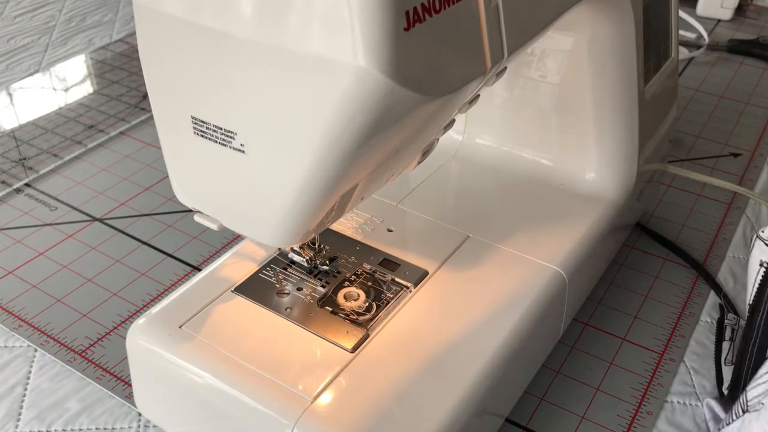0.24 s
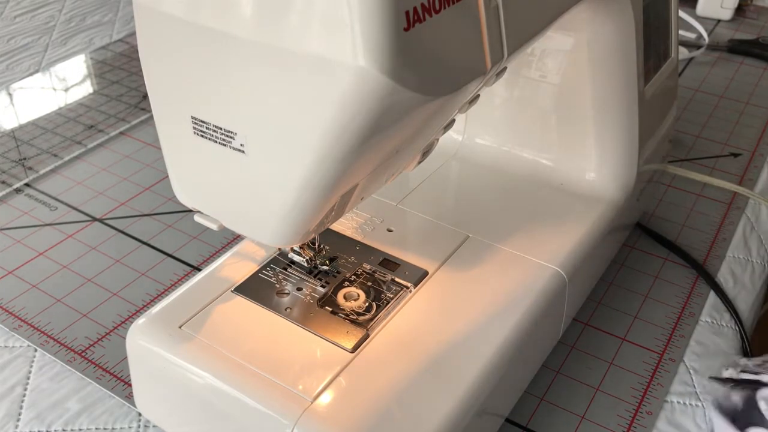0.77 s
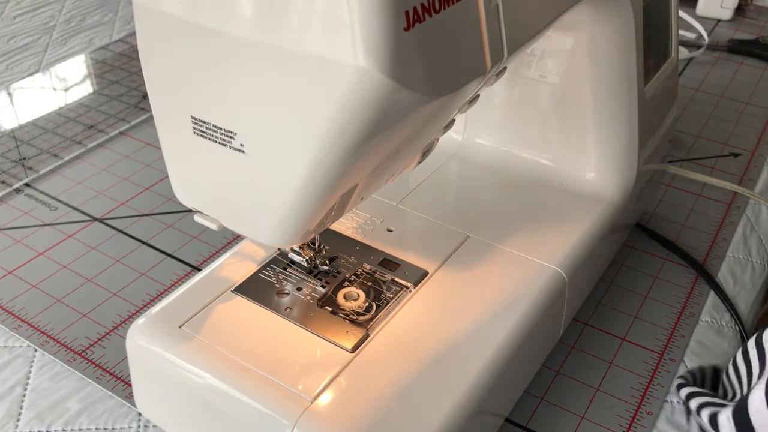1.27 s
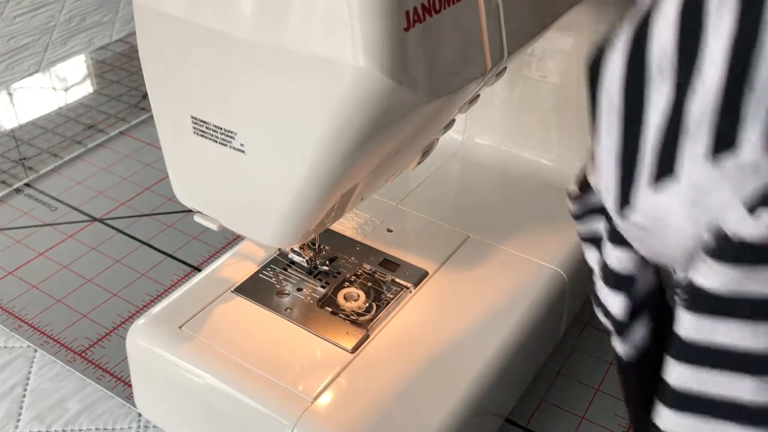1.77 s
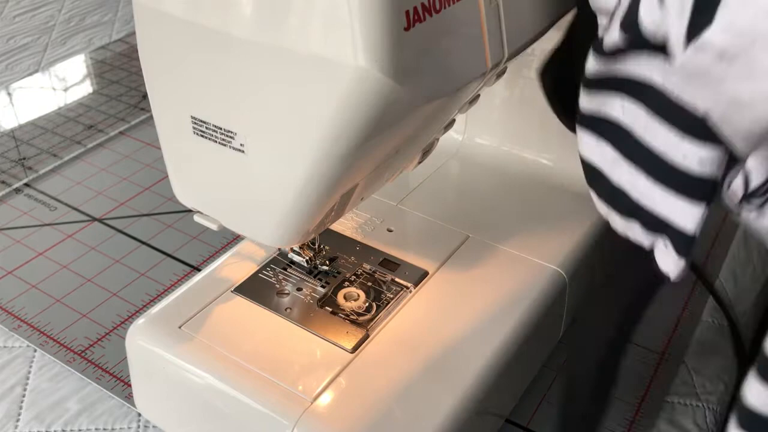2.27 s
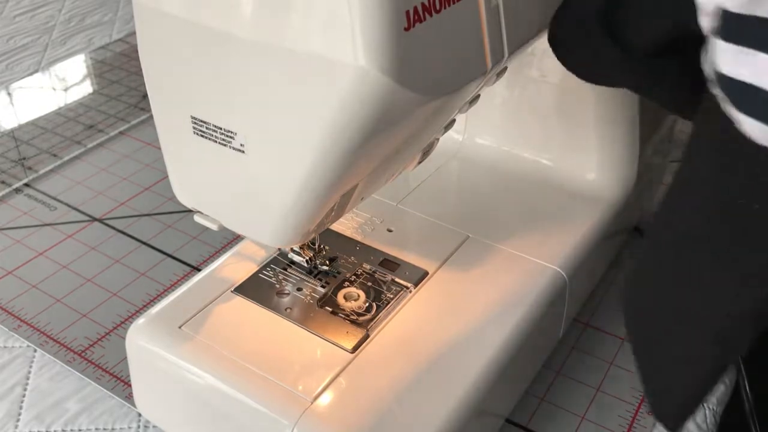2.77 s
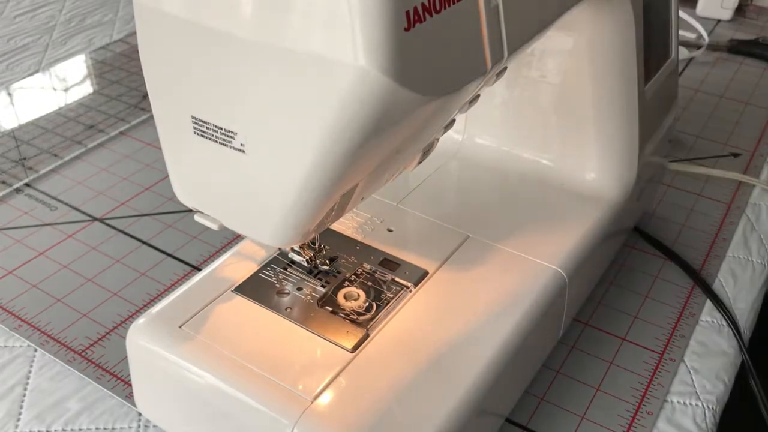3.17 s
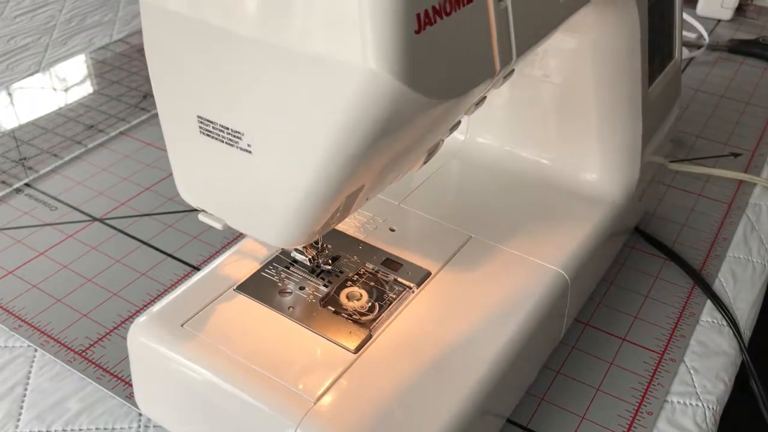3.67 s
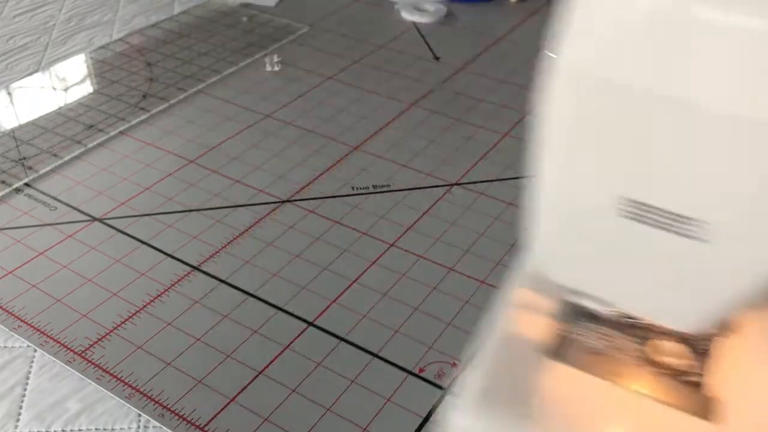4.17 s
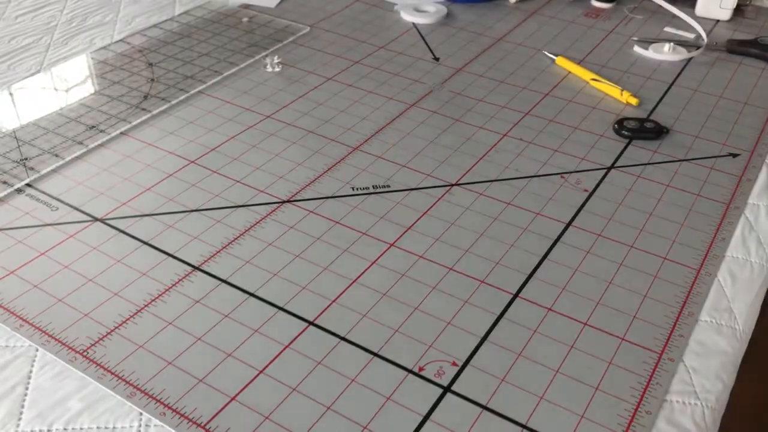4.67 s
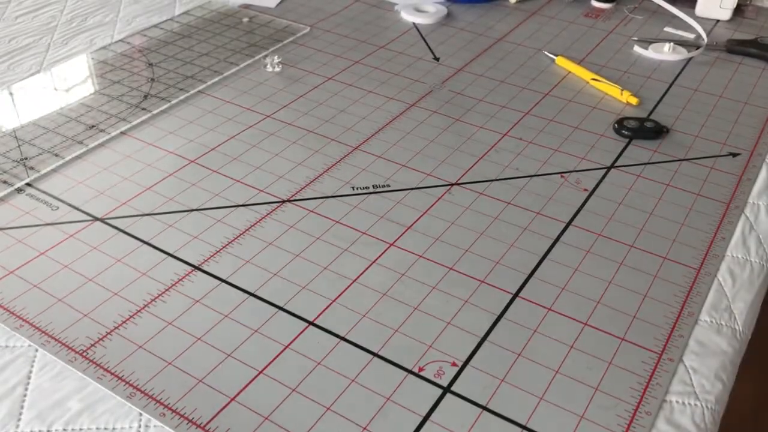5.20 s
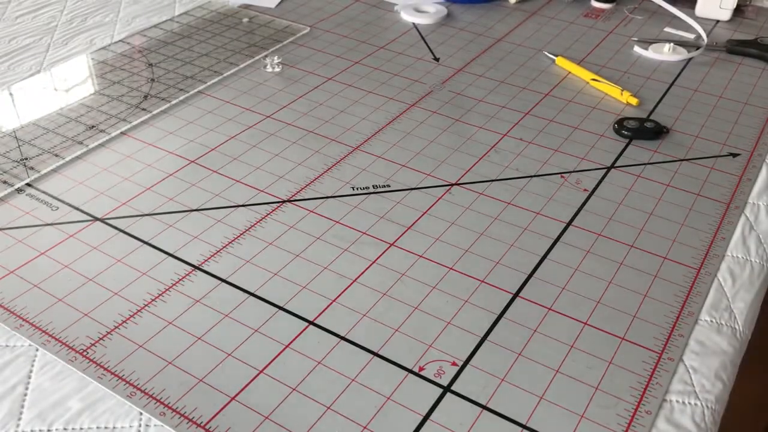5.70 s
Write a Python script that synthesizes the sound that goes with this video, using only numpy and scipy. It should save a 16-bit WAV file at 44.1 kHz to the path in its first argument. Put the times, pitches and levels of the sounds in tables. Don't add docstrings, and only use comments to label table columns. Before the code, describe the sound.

In a quiet room a zipper buzzes twice, fabric is shaken out, and a hollow plastic machine clunks, scrapes aside, followed by small ticks and rustles.

```python
import sys
import numpy as np
from scipy import signal
from scipy.fft import rfft, irfft
from scipy.io import wavfile
from scipy.ndimage import uniform_filter1d

SR = 44100
rng = np.random.default_rng(int(sys.argv[2]) if len(sys.argv) > 2 else 0)


def master(y):
    cut = np.clip(np.atleast_2d(y).T, -1, 1)
    pcm = np.round(cut * 32767)
    wavfile.write(sys.argv[1], SR, pcm.astype(np.int16))


def volts_from_db(level):
    exponent = np.asarray(level, float) / 20
    return 10 ** exponent


N = 262130
SECONDS = np.arange(N) / SR

# (frequency [Hz], width [Hz], level [dB])
TAPE = [(258, 274, 1.5), (450, 260, 6.5), (650, 180, 4.5), (983, 250, 1.5), (1050, 156, 4), (1720, 220, -3)]


def rms_one(x):
    return x / np.sqrt(np.mean(x ** 2) + 1e-20)


def even(x, size):
    return x / np.sqrt(uniform_filter1d(x ** 2, size=size) + 1e-12)


def in_time(rows):
    s, *columns = np.transpose(rows)
    return [np.interp(SECONDS, s, column) for column in columns]


def within(rows, fade=0.0044):
    start, end = rows[0][0], rows[-1][0]
    return np.interp(SECONDS, [start - fade, start, end, end + fade], [0, 1, 1, 0])


def band(x, low_hz, high_hz, order=2):
    edges = [low_hz, min(high_hz, 0.45 * SR)]
    sos = signal.butter(order, edges, "band", fs=SR, output="sos")
    return signal.sosfilt(sos, x + 1e-18)


def colour(x, points):
    hz = np.maximum(np.arange(N // 2 + 1) * SR / N, 1)
    point_hz, point_db = np.transpose(points)
    gain_db = np.interp(np.log(hz), np.log(point_hz), point_db, -90, -90)
    return irfft(rfft(x) * volts_from_db(gain_db), N)


def drift(rate):
    r = np.exp(-80 * np.pi * rate / SR)
    noise = rng.standard_normal(N // 40 + 2002)
    slow = signal.lfilter([1], [1, -2 * r, r * r], noise)[2000:]
    return np.interp(np.arange(N) / 40, np.arange(len(slow)), rms_one(slow))


def resonate(x, peaks):
    out = 0
    for k, (hz, width, db) in enumerate(peaks):
        r = np.exp(-np.pi * max(width, 1) / SR)
        poles = [1, -2 * r * np.cos(2 * np.pi * hz / SR), r * r]
        zeros = [(1 - r * r) / 2, 0, (r * r - 1) / 2]
        out = out + (-1) ** k * volts_from_db(db) * signal.lfilter(zeros, poles, x + 1e-18)
    return out


def grains(per_s, spread_db):
    sizes = volts_from_db(spread_db * np.minimum(rng.exponential(1, N), 5)) * rng.choice([-1, 1], N)
    return sizes * (rng.random(N) < per_s / SR)


def swells(s, length, db):
    drop_db, rise_share = 13, 0.49
    t = np.arange(0, N + 64, 64) / SR
    late = (t[:, None] - s) / np.maximum(length, 0.01)
    gain = volts_from_db(db - drop_db * np.maximum(late, -late / rise_share)).sum(axis=1)
    return np.interp(SECONDS, t, gain)


def background():
    # (frequency [Hz], level per Hz [dB])
    air_spectrum = [(25, -39), (45, 7.5), (76, 8.5), (160, -5.5), (300, -6), (600, -11), (1200, -13),
                    (3000, -26.5), (7000, -22), (15800, -16.5)]
    # (peak time [s], length [s], level [dB])
    rumble_swells = [(1.955, 0.21, -45), (2.31, 0.41, -60), (3.176, 0.32, -53.5), (3.603, 0.13, -70),
                     (3.947, 0.98, -60.5), (4.6, 1, -62.5), (5.19, 0.22, -69)]
    # (frequency [Hz], width [Hz], level [dB])
    hum_tones = [(42, 2.7, -102), (60.5, 1.7, -77), (78.24, 1.15, -66.5), (117, 0.94, -73),
                 (217.7, 5.3, -63)]
    air = volts_from_db(-60.5) * rms_one(colour(rng.standard_normal(N), air_spectrum))
    rumble_gain = (volts_from_db(-82) + swells(*np.transpose(rumble_swells))) * volts_from_db(2 * drift(2.5))
    rumble = rumble_gain * rms_one(band(rng.standard_normal(N), 33, 126))
    hum = 0
    for hz, width, db in hum_tones:
        tone = resonate(rng.standard_normal(N), [(hz, width, 0)])
        hum = hum + volts_from_db(db) * even(tone, 3000)
    return air + rumble + hum


def lone_teeth():
    # (time [s], rasp peak [dB], tape body [dB])
    teeth = [(0.0191, -34, -38.5), (0.3577, -44, -34), (0.3971, -39, -35), (0.418, -41, -37),
             (0.598, -38.5, -39), (0.62, -45, -61), (0.63, -40.5, -38), (0.646, -44, -38),
             (0.653, -49, -38), (0.673, -42, -37), (0.678, -42.5, -41), (0.691, -39, -55),
             (0.694, -48, -29.5), (0.709, -42, -32), (0.717, -35.5, -33), (0.73, -36.5, -33),
             (1.017, -46, -55), (1.0222, -26, -29.5)]
    rasp, tugs = np.zeros(N), np.zeros(N)
    scrape_shape = np.exp(-(np.arange(300) / 127.0) ** 2)
    for s, rasp_db, body_db in teeth:
        i = round(s * SR)
        rasp[i:i + 300] += volts_from_db(rasp_db) * rng.standard_normal(300) * scrape_shape
        tugs[i + 30] = volts_from_db(body_db + 23.0)
    body = resonate(band(tugs, 110, 1400), TAPE) + 0.33 * band(tugs, 130, 410)
    return band(rasp, 680, 21000) + body


def rubbing():
    # (time of greatest pressure [s], length [s], level [dB], brightness [dB])
    strokes = [(0.26, 0.23, -63, 26.5), (0.572, 0.33, -61, 23), (0.743, 0.11, -40, -2),
               (1.015, 0.035, -50, -12), (1.275, 0.34, -51, 11.5), (1.678, 0.13, -56.5, 23.5),
               (1.912, 0.065, -33.5, 8), (2, 0.44, -49, 2), (2.368, 0.46, -62, 13), (2.55, 0.18, -63.5, 8),
               (2.743, 0.053, -65, -25.5), (2.743, 0.13, -67.5, 45.5), (2.882, 0.056, -58, -12.5),
               (2.893, 0.2, -48, 5), (3.107, 0.11, -37.5, 4), (3.2, 0.13, -61, -6.5),
               (3.423, 0.16, -51.5, -1), (3.638, 0.17, -53.5, 20.5), (3.79, 0.39, -56.5, -11.5),
               (4.05, 0.18, -42, 16), (4.175, 0.13, -58, -8.5), (4.446, 0.13, -61.5, 15),
               (4.588, 0.055, -39, 5), (4.65, 0.061, -48, 6.5), (4.777, 0.17, -47, 4.5),
               (5.072, 0.36, -50, -0.5), (5.205, 0.056, -68, -5), (5.285, 0.1, -46, -6.5),
               (5.8, 0.049, -49, -3), (5.905, 0.077, -49, 5.5)]
    edges_hz = [230, 700, 2500, 7000, 15800]
    # (offsets [dB]), (share of brightness [0-1])
    balance = [(-2, 0.8, 0.14, 0.1), (-1.33, 0.054, 0.43, 0.6)]
    fibres = grains(1200 * volts_from_db(2.0 * drift(23)), 1.3) + rng.standard_normal(N)
    flicker_db = 1.2 * drift(14)
    s, length, db, bright = np.transpose(strokes)
    out = 0
    for low_hz, high_hz, offset, share in zip(edges_hz, edges_hz[1:], *balance):
        layer = rms_one(band(fibres, low_hz / 1.2, high_hz * 1.2))
        out = out + swells(s, length, db + offset + share * bright) * layer
    return volts_from_db(flicker_db - 10.0) * out


def ticks(size=200):
    # (time [s], peak level [dB], frequency [Hz])
    tick_rows = [(0.3993, -34, 1170), (0.4191, -31, 1080), (.598, -34, 4530), (2.7126, -24, 6000),
                 (2.9064, -39, 2500), (3.0552, -20, 4900), (3.072, -19, 3600), (3.08, -18, 5060),
                 (3.091, -27.5, 1510), (3.7158, -15.5, 6700), (3.758, -32, 1000), (3.7853, -44, 2270),
                 (3.786, -37, 3820), (3.85, -54, 700), (3.899, -34, 800), (4.1614, -32, 2150),
                 (4.1626, -30, 1000), (4.1814, -51, 2150), (4.5661, -27, 4830), (4.745, -32, 2980),
                 (4.843, -47, 7000), (5.014, -42, 4050), (5.0135, -34, 6100), (5.1253, -35, 3860),
                 (5.1934, -37, 1800), (5.2558, -32, 3400), (5.28, -33, 5030), (5.4906, -37, 3530),
                 (5.589, -44, 2400), (5.8318, -42, 2960), (5.852, -35, 2800), (5.743, -50, 1600),
                 (5.909, -40, 1600), (5.912, -42, 2900), (4.2, -42, 2400)]
    cycles = 2.8
    t, out = np.arange(size) / SR, np.zeros(N + size)
    for s, db, hz in tick_rows:
        fade = volts_from_db(db + 0.5 - 20 * t * hz / cycles)
        out[round(s * SR):][:size] += fade * np.sin(2 * np.pi * hz * t)
    return out[:N]


def pull(rows, tape, seated, between, push_hz, taut_db):
    # (frequency [Hz], level per Hz [dB])
    rasp_spectrum = [(700, -5), (1200, -6.5), (2000, -7.5), (3000, -12), (5500, -9.5), (8500, -9.5),
                     (12000, -5), (16500, -1)]
    per_s, body_db, uneven = in_time(rows)
    rasp_db = body_db + 4.5 + 3.5 * np.log2(per_s / 224)
    on = within(rows)
    pace = per_s * on * np.clip(1 + uneven * drift(120), 0.2, 2)
    teeth = np.cumsum(pace) / SR
    tooth, chance = np.ceil(teeth).astype(int), rng.standard_normal(N)
    strength = volts_from_db(1.7 * chance[tooth])
    tugs = np.diff(np.floor(teeth), prepend=0) * strength ** 0.7

    until = (1 - teeth % 1) / per_s
    scrape = (strength * np.exp(-(until / seated) ** 4) + between * (per_s / 250) ** 2) * on
    grit = scrape * (rng.standard_normal(N) + 0.14 * grains(1600, 2))

    drive = band(tugs, 140, push_hz, order=1) + 0.018 * grit
    flex = rms_one(uniform_filter1d(chance, size=7))
    taut = taut_db * np.log2(np.minimum(per_s / 330, 1))
    body = 0
    for k, peak in enumerate(tape):
        gain_db = flex[tooth + 500 * (k + 1)] + taut * np.log2(peak[0] / 400)
        if k == 0:
            gain_db = gain_db - 44 * uneven
        body = body + (-1) ** k * resonate(drive * volts_from_db(gain_db), [peak])

    sings = volts_from_db(4.5 + 42 * np.log2(per_s / 400)) * resonate(grit, [(6400, 900, 0)])
    rasp = colour(grit + sings, rasp_spectrum)
    mix = volts_from_db(body_db) * even(body, 2200) + volts_from_db(rasp_db) * even(rasp, 2200)
    return mix * within(rows, 0.004)


def cracks(size=900):
    # (time [s], peak level [dB], t60 [s])
    edges = [
        (1.0232, -18, 0.0051),
        (1.8758, -15, 0.015),
        (3.0525, -35, .01),
        (3.0698, -28, .01),
        (3.7153, -19, 0.019),
        (4.565, -24, .014),
        (4.5672, -24, 0.0079),
        (5.2545, -36.5, .01),
    ]
    t, out = np.arange(size) / SR, np.zeros(N + size)
    for s, db, t60 in edges:
        hiss = rng.standard_normal(size) * volts_from_db(-60 * t / max(t60, 0.004))
        burst = band(hiss, 9000, 17500)
        out[round(s * SR):][:size] += volts_from_db(db) * burst / np.abs(burst).max()
    return out[:N]


def end_stop():
    stop_s, push_s = 1.0248, 0.003
    push = np.sin(np.pi * np.clip((SECONDS - stop_s) / push_s, 0, 1))
    return volts_from_db(-33) * band(push, 70, 4000, order=1)


def flap():
    # (time [s], boom level [dB])
    push = [
        (1.84, -55),
        (1.854, -31),
        (1.876, -26.5),
        (1.908, -37.5),
        (1.934, -33.5),
        (1.966, -51),
        (2.014, -42.5),
        (2.036, -55),
        (2.2, -60),
    ]
    # (frequency [Hz], width [Hz], level [dB])
    air_modes = [(101, 17, -2), (148.5, 13.8, 2.5), (250, 82, -21.5)]
    # (peak time [s], length [s], level [dB])
    settling = [(1.893, 0.073, -40)]
    boom_db = in_time(push)[0]
    boom = even(resonate(rng.standard_normal(N), air_modes), 1200)
    rustle = rms_one(band(grains(1700, 3.5) + rng.standard_normal(N), 570, 5600, order=1))
    mix = volts_from_db(boom_db) * boom + swells(*np.transpose(settling)) * rustle
    return mix * within(push, 0.0026)


def blow_rows():
    # (time [s], peak level [dB], brightness [dB], t60 [s])
    knock_rows = [(1.8435, -39, -2.5, 0.16), (2.703, -27.5, -14, 0.22), (2.7045, -47, 6.5, 0.39),
                  (3.371, -39.5, -34, 0.011), (3.439, -53, 2, 0.039), (3.499, -37.5, 0, 0.017),
                  (3.787, -59, 5.5, 0.066), (3.898, -55, -27, 0.04), (4.115, -49, 6, 0.028),
                  (4.161, -47, 5.5, 0.1), (4.178, -38, 0.5, 0.053), (5.052, -54, -5, 0.51),
                  (5.194, -40.5, 3, .03), (5.241, -50, -4, 0.11), (5.293, -52, 6, 0.015),
                  (5.378, -65, 6.5, 0.028), (5.732, -53, -8, 0.038), (5.744, -53, -32.5, 0.34),
                  (5.896, -59, 6, 0.12), (5.908, -46.5, 0.5, 0.11)]
    # (time [s], peak level [dB], brightness [dB], t60 [s])
    thud_rows = [(2.184, -44, 9, 0.089), (2.251, -55.5, 11, 0.11), (2.509, -50.5, -17, 0.056),
                 (2.566, -44.5, -27, 0.076), (2.676, -40.5, -30, 0.37), (2.918, -48, -1, 0.025),
                 (2.944, -35, 7, 0.051), (3.494, -31.5, 8, 0.023), (3.758, -38, -12, 0.0097),
                 (3.849, -50.5, -27, 0.049), (5.009, -57.5, 11, 0.17), (5.025, -56.5, 10, 0.21),
                 (5.278, -41, -15, 0.15), (5.436, -48.5, -64, 0.03), (5.56, -48.5, -31, 0.061),
                 (5.59, -55.5, -7, 0.074), (5.716, -54.5, -36, 0.16), (5.764, -73, -8, 0.084),
                 (5.817, -50.5, 7.5, 0.089), (5.83, -48.5, 8, 0.086), (5.85, -51.5, 9.5, 0.25)]
    # (time [s], peak level [dB], brightness [dB], t60 [s])
    snap_rows = [(1.856, -42.5, 11.5, 0.076), (1.876, -46, 16, 0.044), (1.8803, -27.5, 4, 0.047),
                 (2.657, -63, -15, 0.025), (3.052, -52, 12, 0.13), (3.07, -33.5, 1, 0.33),
                 (3.077, -39.5, 6.5, 0.13), (3.392, -48, -1, 0.046), (3.664, -45, 14.5, 0.04),
                 (3.715, -35.5, 9, 0.034), (4.392, -37, -9, 0.053), (4.555, -46, 5, 0.083),
                 (4.5648, -51, 14.5, 0.39), (4.739, -66, 21, 0.032), (4.745, -42, -0.5, 0.17),
                 (4.804, -54, 9, 0.039), (4.839, -58, 11.5, 0.11), (5.126, -45, 0.5, 0.15),
                 (5.256, -39.5, 2, 0.048), (5.49, -39, -7.5, 0.051), (5.505, -53, 2, 0.039),
                 (5.565, -68, 11, 0.024)]
    # (offsets [dB]), (change per dB of brightness [dB])
    knock_kind = [(0, -25.5, -10.5, -28, -24), (0, 4, 3, 6, 4.5)]
    thud_kind = [(-0.74, 0.011, -6.5, -36.5, -34.5), (0.31, 0.0082, 0.14, 3.5, 3)]
    snap_kind = [(-2.5, -9.5, -2, 0.82, -3), (0.14, 0, 0.1352, 1, 0.51)]
    blows = []
    for rows, kind in [(knock_rows, knock_kind), (thud_rows, thud_kind), (snap_rows, snap_kind)]:
        offsets, shares = np.array(kind)
        for s, db, bright, t60 in rows:
            blows.append((s, *(db + offsets + bright * shares), t60))
    return np.array(sorted(blows))


def knocks(size=5000):
    # (frequency [Hz], level [dB], t60 [s])
    shell = [(293.6, -9, 0.16), (369, 1.5, 0.011), (562.3, -10, 0.086), (615, -9.5, 0.018),
             (863, -8.5, 0.054), (1050, -8.5, 0.049), (1280, -9, 0.017), (1440, -4.5, 0.017),
             (1766, 3.5, 0.0082), (2550, 3, 0.0087), (2113, -3.5, 0.024), (3360, -21, 0.016),
             (3970, 0, 0.021), (4100, -9, 0.016)]
    # (low edge [Hz], high edge [Hz], decay share, ringing share [0-1])
    ranges = [(650, 1800, .9, .5), (220, 700, 1.2, .45), (1800, 3300, .75, .3), (5000, 17000, .5, .01),
              (3200, 4900, .65, .04)]
    t, out, rows = np.arange(size) / SR, np.zeros(N + size), blow_rows()
    t60 = np.clip(rows[:, -1:], 0.008, 0.3)
    hiss = rng.standard_normal((len(rows), size))
    steps = rng.standard_normal((len(rows), 50))
    chatter = volts_from_db(1.8 * np.repeat(steps, size // 50, axis=1))
    modes = 0
    for hz, db, mode_t60 in shell:
        level_chance, pitch_chance = rng.standard_normal((2, len(rows), 1))
        fade = volts_from_db(-60 * t / (np.clip(mode_t60, 0.005, 0.1) * (t60 / 0.07) ** 0.6))
        tone = np.sin(2 * np.pi * hz * (1 + 0.015 * pitch_chance) * t)
        modes = modes + volts_from_db(db + 2.5 * level_chance) * fade * tone
    blows = 0
    for db, (low_hz, high_hz, quick, ringing) in zip(rows.T[1:-1], ranges):
        contact = 1 - np.exp(-t * low_hz * 0.88)
        crack = 3 * hiss * chatter * volts_from_db(-60 * t / (quick * t60))
        part = band(contact * (ringing * modes + (1 - ringing) * crack), low_hz, high_hz)
        blows = blows + volts_from_db(db[:, None] + 5.0) * part / np.abs(part).max(axis=1, keepdims=True)
    blows = blows * np.cos(np.pi / 2 * t / t[-1])
    for s, blow in zip(rows[:, 0], blows):
        out[round(s * SR):][:size] += blow
    return out[:N]


def panels(size=9000):
    # (time [s], frequency [Hz], peak level [dB], t60 [s])
    panel_rows = [(2.564, 895, -38, 0.026), (2.658, 5330, -46, 0.015), (2.704, 845, -27.5, 0.11),
                  (2.706, 1030, -27.5, 0.12), (2.704, 1423, -30, 0.079), (2.704, 2110, -32, 0.054),
                  (2.708, 304, -38, 0.37), (2.83, 316.5, -43, 0.34), (2.834, 1620, -49.5, 0.12),
                  (2.88, 1440, -49, 0.06), (2.897, 875, -46, 0.13), (2.917, 537, -43, 0.076),
                  (2.946, 1470, -27.5, 0.027), (2.945, 2200, -32.5, 0.025), (2.946, 2770, -36, 0.035),
                  (2.948, 290, -42, 0.039), (3.056, 5400, -44, 0.02), (3.073, 4100, -33, 0.023),
                  (3.078, 5720, -35, 0.036), (3.368, 890, -46, 0.049), (3.37, 2210, -50, 0.045),
                  (3.379, 282, -44.5, 0.33), (3.393, 1510, -45, 0.047), (3.438, 1040, -41.5, 0.034),
                  (3.495, 883, -27.5, 0.033), (3.496, 1060, -35, 0.069), (3.497, 2750, -40.5, 0.028),
                  (3.495, 305, -31, 0.1), (3.665, 2090, -43, 0.036), (3.667, 2790, -43.5, 0.03),
                  (3.731, 287, -35, 0.051), (3.759, 860, -41, 0.038), (3.786, 2260, -54, 0.025),
                  (3.85, 1420, -47, 0.033), (3.894, 1030, -45.5, 0.026), (3.902, 616, -41, 0.037),
                  (4.162, 1022, -36, 0.035), (5.011, 290, -43.5, 0.12), (5.026, 1610, -57, 0.049),
                  (5.053, 1630, -56, 0.22), (5.198, 1033, -48.5, 0.15), (5.256, 2220, -36, 0.035),
                  (5.271, 540, -36.5, 0.13), (5.378, 1310, -49, 0.049), (5.436, 602, -44, 0.047),
                  (5.49, 754, -44, 0.049), (5.729, 1630, -54, 0.07), (5.829, 1720, -49, 0.12),
                  (5.852, 290, -43, 0.09), (5.904, 1474, -52, 0.17)]
    t, out = np.arange(size) / SR, np.zeros(N + size)
    for s, hz, db, t60 in panel_rows:
        apart, turn = rng.random(2)
        neighbour = np.sin(2 * np.pi * (hz * (1.02 + 0.03 * apart) * t + turn))
        tone = np.sin(2 * np.pi * hz * t) + 0.35 * neighbour
        fade = volts_from_db(db - 60 * t / np.clip(t60, 0.015, 0.3))
        out[round(s * SR):][:size] += fade * (1 - np.exp(-t * hz * 1.15)) * tone
    return out[:N]


def rattle():
    # (time [s], peak level [dB])
    bounce_rows = [
        (2.7252, -43),
        (2.7312, -37),
        (2.7362, -42),
        (2.74, -33),
    ]
    # (frequency [Hz], level [dB])
    metal_modes = [(14700, 0), (9500, -5.5), (7000, -10)]
    ring_s = 0.0013
    bounces = sum(volts_from_db(db) * np.exp(-((SECONDS - s) / ring_s) ** 2) for s, db in bounce_rows)
    return bounces * sum(volts_from_db(db) * np.sin(2 * np.pi * hz * SECONDS) for hz, db in metal_modes)


def drag():
    # (time [s], level [dB])
    path = [
        (3.94, -66),
        (3.985, -39),
        (4.002, -29),
        (4.02, -30),
        (4.042, -26.5),
        (4.06, -32),
        (4.117, -36.5),
        (4.13, -42),
        (4.25, -74),
    ]
    # (frequency [Hz], width [Hz], level [dB], strongest moment [s])
    case_modes = [(540, 20, 2.5, 4.11), (957, 124, 5, 4.1), (1122, 310, 5.5, 4.04), (1200, 130, 6.5, 4.01),
                  (1320, 95, -2, 4.04), (1800, 110, 0, 4.045), (2090, 290, -2, 4.05), (3080, 400, 0.5, 4.1),
                  (4470, 490, 3.5, 4.05), (5370, 120, 5.5, 4.03), (7050, 280, -6, 4.05)]
    case_db = in_time(path)[0]
    slips = grains(1500 * volts_from_db(1.8 * drift(60)), 2.2) + 0.4 * rng.standard_normal(N)
    case = 0
    for k, (hz, width, db, s) in enumerate(case_modes):
        sunk_db = np.minimum(12.5 * ((SECONDS - s) / 0.083) ** 2, 12.0)
        gain = volts_from_db(2.0 * drift(20) - sunk_db)
        case = case + (-1) ** k * gain * resonate(slips, [(hz, width, db)])
    low = even(band(case, 280, 2080), 500)
    scratch = even(band(case + 0.39 * slips, 2300, 7500), 500)
    return (volts_from_db(case_db) * low + volts_from_db(case_db - 12.5) * scratch) * within(path, 0.01)


def scuff():
    # (time [s], level [dB])
    whip = [
        (4.3742, -42),
        (4.377, -35.5),
        (4.383, -34),
        (4.395, -31.5),
        (4.398, -54),
        (4.41, -64),
    ]
    # (frequency [Hz], width [Hz], level [dB])
    cord_modes = [(1000, 670, -6.5), (2314, 33, 8), (3900, 570, 4), (6870, 820, 6.5), (9150, 1700, 1),
                  (13200, 2600, 1)]
    scrape = rms_one(resonate(rng.standard_normal(N), cord_modes))
    return volts_from_db(in_time(whip)[0]) * scrape * within(whip, 0.00084)


def rings():
    # (time [s], frequency [Hz], level [dB], t60 [s])
    ring_rows = [(4.645, 1525, -57, .5), (4.67, 1525, -63, .2), (4.391, 4000, -38, .07),
                 (4.746, 3000, -48, .04), (4.746, 1250, -50, .05), (4.385, 2300, -56, .12),
                 (4.395, 3800, -54, .2), (4.392, 4050, -54, .15), (4.635, 3300, -60, .35),
                 (4.6, 2050, -63, .35), (4.64, 2600, -62, .35)]
    # (time [s], level [dB])
    spring = [
        (4.56, -90),
        (4.6, -72),
        (4.9, -69),
        (5.12, -72),
        (5.17, -103),
    ]
    squeal = rms_one(resonate(rng.standard_normal(N), [(9740, 80, 0)]))
    out = squeal * volts_from_db(in_time(spring)[0]) * within(spring)
    for s, hz, db, t60 in ring_rows:
        late = SECONDS - s
        fade = volts_from_db(db - 60 * np.abs(late) / t60 + 2 * drift(32)) * (late > 0)
        out = out + fade * np.sin(2 * np.pi * hz * SECONDS)
    return out


def room(x):
    t60_s, wall_cut_hz = 0.36, 3200
    t = np.arange(SR) / SR
    reflections = rng.standard_normal(SR) * np.clip(t / 0.002, 0, 1)
    low = band(reflections, 145, wall_cut_hz, order=1)
    high = band(reflections - low, 1000, 22000, order=1)
    tail = low * volts_from_db(-60 * t / t60_s) + 0.8 * high * volts_from_db(-60 * t / (0.53 * t60_s))
    return signal.fftconvolve(x, tail / np.linalg.norm(tail))[:N]


def scene():
    # (time [s], rate [teeth per s], level [dB], unevenness [0-1])
    first_pull = [
        (.4262, 152, -46, 0),
        (.446, 176, -40.5, 0.06),
        (.455, 268, -41.5, 0.04),
        (.47, 292, -41.5, 0),
        (.492, 300, -41.5, 0.05),
        (.508, 310, -41, 0.13),
        (.522, 270, -44.5, 0.3),
        (.56, 218, -48.5, 0.1),
        (.6, 58, -59, 0.31),
    ]
    second_pull = [
        (.736, 117.6, -47, 0.017),
        (.798, 157.6, -44.5, .015),
        (.834, 213.2, -44.5, .015),
        (.872, 282.8, -43, 0.014),
        (.904, 330.8, -44.5, 0.032),
        (.936, 328.3, -41, 0.031),
        (.96, 360, -42, 0.012),
        (.995, 371, -43, 0.013),
        (1.021, 410, -40.5, 0.017),
    ]
    # (frequency [Hz], width [Hz], level [dB])
    slack_tape = [(290, 130, 2), (620, 470, -0.5), (810, 350, 4), (1000, 260, 0), (1870, 160, -10.5)]
    zipper = pull(first_pull, slack_tape, seated=0.0024, between=0.2, push_hz=1500, taut_db=1)
    zipper = zipper + pull(second_pull, TAPE, seated=0.0024, between=0.4, push_hz=1800, taut_db=5)
    zipper = zipper + lone_teeth() + end_stop()
    handling = ticks() + knocks() + panels() + rattle() + drag() + scuff()
    wet = volts_from_db(-10.5) * room(volts_from_db(-2.0) * zipper + handling)
    cloth = rubbing() + flap()
    return (zipper + handling + cloth + cracks() + rings() + wet + background())[None]


def roll_off(x):
    return signal.sosfilt(signal.butter(12, 16680, fs=SR, output="sos"), x)


def record(dry):
    # (frequency [Hz], level [dB])
    microphone = [(28, -23), (36, 7), (45, -2), (4300, -0.24), (4900, -4), (5500, -2), (7700, -6.5),
                  (9000, -5), (10400, -10.5), (11800, -9.5), (15800, -14), (15900, -35), (16700, -45.5),
                  (17000, -64)]
    return roll_off(colour(dry[0], microphone)[None])


dry = scene()
out = record(dry)
master(out)
```